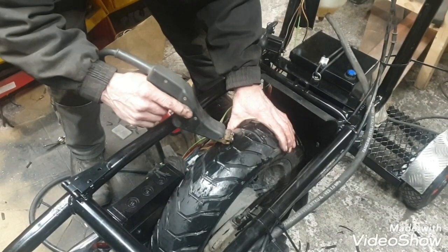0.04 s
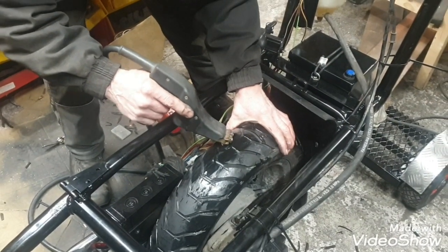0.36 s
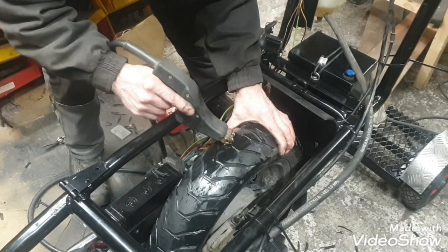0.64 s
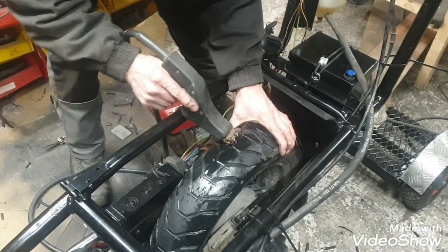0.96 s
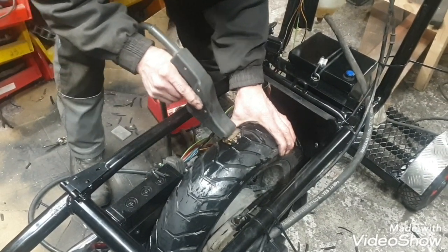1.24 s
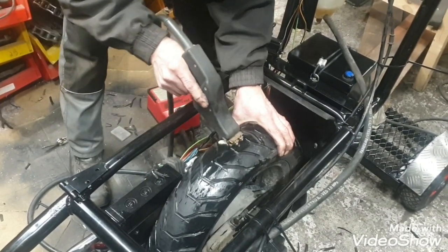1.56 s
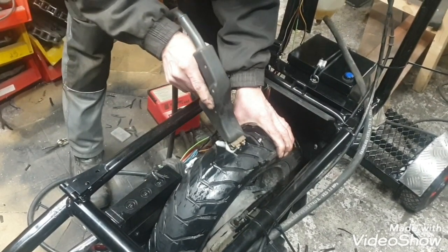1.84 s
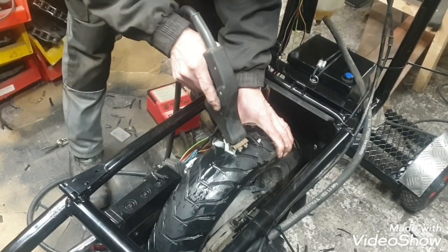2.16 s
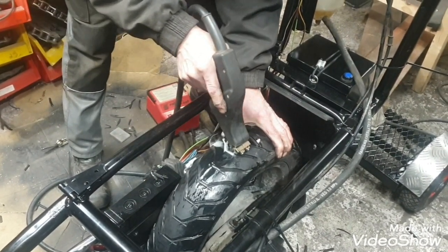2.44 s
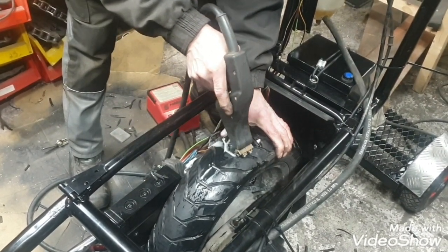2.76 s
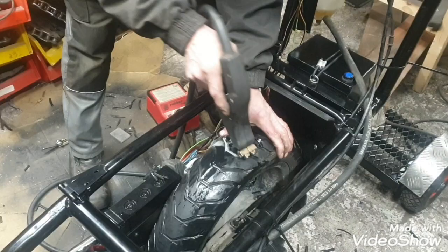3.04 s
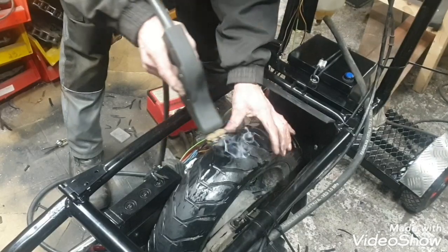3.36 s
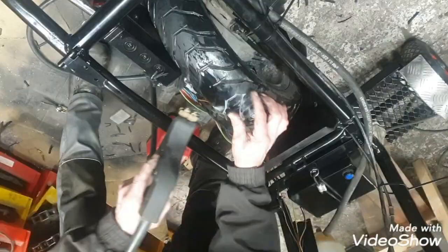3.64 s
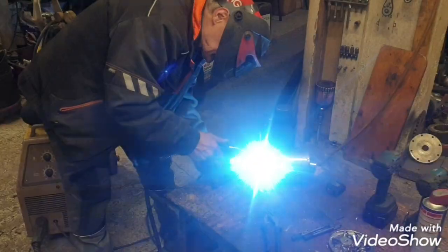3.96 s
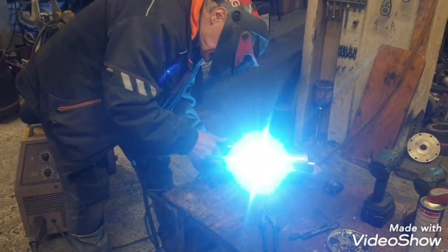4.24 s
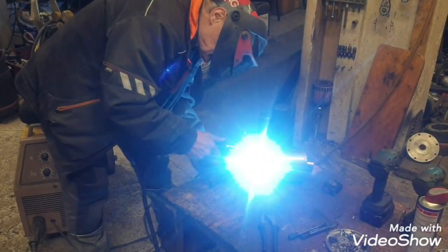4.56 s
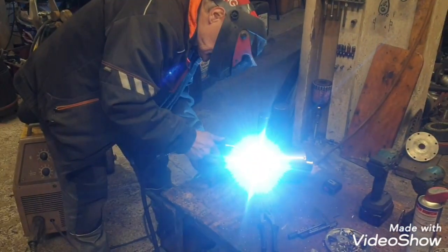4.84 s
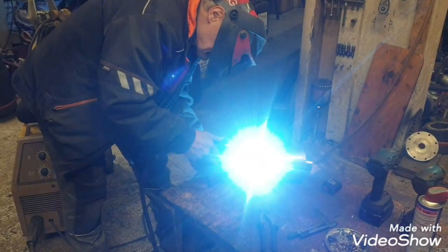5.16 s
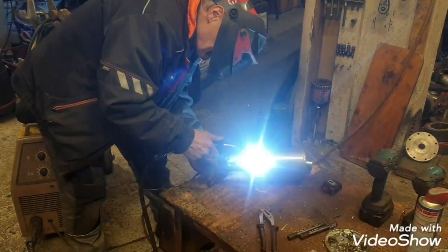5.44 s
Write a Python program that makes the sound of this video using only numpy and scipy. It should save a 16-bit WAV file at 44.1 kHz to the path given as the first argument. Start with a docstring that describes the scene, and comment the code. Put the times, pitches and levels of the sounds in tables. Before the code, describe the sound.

In a workshop, a hand tool clicks, knocks and rubs quietly on a tyre over a low rumble, ending in a sharper clack with a brief steel ring. This fades away and a much louder welding arc fades in, with sharp, irregular pops over a fine sizzle. The arc stops suddenly, leaving a short room echo and a faint low drone. A stereo microphone pair hears it all slightly to the left.

```python
"""Tyre work and arc welding in a workshop

From a stereo pair in the room: a hand tool clicks, knocks and rubs quietly on a tyre over a low rumble.
That fades away and a welding arc fades in on a steel bench, with the right microphone shaded from it.
Molten drops burst in sharp, irregular pops over a fine sizzle, thrown back by the bench and the walls,
until the arc stops and the room rings out over a low drone."""
import sys
import numpy as np
from scipy import signal
from scipy.fft import rfft, irfft, next_fast_len
from scipy.io import wavfile
from scipy.ndimage import uniform_filter1d, map_coordinates

SR = 44100
rng = np.random.default_rng(int(sys.argv[2]) if len(sys.argv) > 2 else 0)


def waveform_to_disk(signal):
    """Save audio, clipped to [-1, 1], as 16-bit WAV at the path in sys.argv[1]."""
    frames = np.transpose(np.atleast_2d(signal))
    scaled = np.clip(frames, -1, 1) * 32767
    samples = np.round(scaled).astype(np.int16)
    wavfile.write(sys.argv[1], SR, samples)


N = 246959
TIME, CONTACT_TIME = np.arange(N) / SR, np.arange(SR // 2) / SR  # s: the scene, one contact
ARC_ON_S, ARC_OFF_S = 3.58, 5.455


def amp(db):
    return 10 ** (np.asarray(db) / 20)


def unit(x):
    return x / np.sqrt(np.mean(x ** 2) + 1e-20)


def along(points, hz):
    """Read (Hz, value) points on a log frequency axis."""
    point_hz, values = np.transpose(points)
    return np.interp(np.log(hz + 1), np.log(point_hz + 1), values)


def wobble(rate):
    """A smooth random curve, rate knots a second."""
    return map_coordinates(rng.standard_normal(int(N * rate / SR) + 4), [TIME * rate])


def swell(start, length, attack_s, release_s):
    """Straight attack, hold until start + length, then an exponential release."""
    t = TIME - start
    return np.clip(t / attack_s, 0, 1) * np.exp(-np.maximum(t - length, 0) / release_s)


def filtered(x, response):
    """Shape x by a response, a function of frequency."""
    n = x.shape[-1]
    size = next_fast_len(n + SR // 4)
    return irfft(rfft(x, size) * response(np.fft.rfftfreq(size, 1 / SR)), size)[..., :n]


def ride_band(x, low_hz, high_hz, gain_db):
    """Raise or lower one band of x by a gain that moves in time."""
    band = filtered(x, lambda hz: 1 / (1 + (hz / high_hz) ** 4) - 1 / (1 + (hz / low_hz) ** 4))
    return x + band * (amp(gain_db) - 1)


def convolved(x, kernel):
    """Causal convolution, cut to the length of x."""
    return signal.fftconvolve(np.atleast_2d(x), np.atleast_2d(kernel), axes=1)[:, :x.shape[-1]]


def impulse(colour, peaks=(), size=4096):
    """The shortest causal pulse with this (Hz, dB) colour and these (Hz, width Hz, dB) peaks."""
    hz = np.fft.rfftfreq(size, 1 / SR)
    peaks_db = sum(db / (1 + ((hz - centre) / width) ** 2) for centre, width, db in peaks)
    cepstrum = irfft(np.log(amp(along(colour, hz) + peaks_db)))
    cepstrum[1:size // 2] *= 2
    cepstrum[size // 2 + 1:] = 0
    return irfft(np.exp(rfft(cepstrum)))


def diffuse(n):
    """White stereo noise, alike at both microphones only in the bass."""
    # likeness of left and right: frequency_hz, correlation
    likeness = [(40, 0.94), (130, 0.86), (300, 0.77), (700, 0.32), (2000, 0)]
    angle = lambda hz: np.arccos(np.clip(along(likeness, hz), -1, 1)) / 2
    weights = lambda hz: np.array([np.cos(angle(hz)), np.sin(angle(hz))])
    mid, side = filtered(rng.standard_normal((2, n)), weights)
    return np.array([mid + side, mid - side])


def noise(colour):
    """Coloured stereo noise of rms 1."""
    return unit(filtered(diffuse(N), lambda hz: amp(along(colour, hz))))


def burst(pulse, t60):
    """A dying puff of stereo noise with the pulse's colour."""
    puff = diffuse(len(CONTACT_TIME)) * amp(-60 * CONTACT_TIME / t60)
    return convolved(puff, pulse / np.linalg.norm(pulse))


def ringing(modes, attack_s, t=CONTACT_TIME):
    """Damped sines from (Hz, dB, t60 s) rows."""
    ring = sum(amp(db - 60 * t / t60) * np.sin(2 * np.pi * hz * t) for hz, db, t60 in modes)
    return ring * (1 - np.exp(-t / attack_s))


def room_tail(build_s):
    """The workshop's stereo reverberation builds up, then dies, fastest in the top treble."""
    # decay of the room: frequency_hz, t60_s
    decay = [(150, 0.49), (800, 0.36), (3000, 0.43), (7000, 0.33), (15000, 0.21)]
    hz, t, spectrum = signal.stft(diffuse(SR * 3 // 4), SR, nperseg=256)
    tail = signal.istft(spectrum * amp(-60 * t / along(decay, hz)[:, None]), SR, nperseg=256)[1]
    tail *= 1 - np.exp(-np.arange(tail.shape[1]) / SR / build_s)
    return tail / np.linalg.norm(tail[0])


def contact(start_s, sound, room_db):
    """One contact placed in time, with the room's answer."""
    out = np.zeros((2, N + SR))
    room = amp(room_db) * convolved(sound, room_tail(build_s=0.0013))
    out[:, round(start_s * SR):][:, :len(CONTACT_TIME)] = sound + room
    return out[:, :N]


def rumble_and_rubbing():
    """Room tone and rubbing; each stroke on the tyre lifts rumble and rub and makes the rubber groan."""
    # the hand pushes the tool: start_s, length_s, rub_db, rumble_db, groan_hz, groan_db
    strokes = [(0.33, 0.32, -83, -60, 150, -64.5), (1.407, 0.24, -75.5, -73, 425, -73),
               (2.39, 0.15, -80, -64.5, 339, -79), (2.894, 0.12, -72, -55, 302, -71)]
    # colours of the three noises: frequency_hz, level_db
    rumble_colour = [(20, -6), (34, 3.5), (50, -1.5), (100, 2.5), (125, -6), (175, -15), (230, -20.5),
                     (268, -10), (330, -33), (700, -54)]
    rub_colour = [(120, -19.5), (300, 0.5), (430, -0.5), (580, -9.5), (1200, -16.5), (1950, -17.5),
                  (2250, -9), (2500, -19), (5000, -31.5)]
    hiss_colour = [(300, 9.5), (2000, -1), (3500, -2.5), (6000, -1.5), (7500, -13), (9500, -8),
                   (11000, -1.5), (15000, 0.5)]
    rub_gain, rumble_gain, groan = amp(-84), amp(-64), np.zeros(N)  # between strokes
    for start, length, rub_db, rumble_db, groan_hz, groan_db in strokes:
        push = swell(start, length, attack_s=0.032, release_s=0.1)
        rub_gain = np.hypot(rub_gain, amp(rub_db) * push)
        rumble_gain = np.hypot(rumble_gain, amp(rumble_db) * push)
        groan += amp(groan_db) * push * np.sin(2 * np.pi * groan_hz * TIME)
    rumble = rumble_gain * amp(1.04 * wobble(rate=7.9)) * noise(rumble_colour)
    rub = rub_gain * amp(wobble(rate=25.3)) * noise(rub_colour)
    groan *= wobble(rate=130)  # widens the tone into a rough resonance
    hiss = amp(-73.5) * noise(hiss_colour)
    return (rumble + rub + groan + hiss) * amp([[0.8], [-0.8]])


def clacks():
    """Hard parts clack together; the struck part adds its own resonance."""
    # collisions: start_s, level_db, resonance_hz, height_db, t60_s
    hits = [(0.342, -62, 4530, 7, .1), (.381, -55, 3980, 12, 0.074), (.396, -59.5, 3600, 17, 0.11),
            (.811, -73.5, 5600, 20, 0.15), (2.086, -53.5, 2410, 9.5, 0.08), (2.088, -54.5, 5230, 27, 0.18),
            (2.1, -54.5, 2920, 15, 0.075), (2.735, -68.5, 5650, 16.5, 0.48), (2.913, -50.5, 6400, 20, 0.14),
            (3.017, -54.5, 2800, 8, 0.27), (3.043, -35, 2500, 5.5, 0.036), (3.05, -37.5, 5400, 7.5, 0.02),
            (3.093, -46.5, 1210, 18, 0.037)]
    # colour of a clack: frequency_hz, level_db
    colour = [(400, -6.5), (1200, -10.5), (1750, -10), (2100, -4.5), (3700, -6.5), (4600, -4), (5400, -5),
              (7000, -7), (10000, -34.5)]
    out = np.zeros((2, N))
    for start, db, hz, height_db, t60 in hits:
        pulse = impulse(colour, peaks=[(hz, 0.29 * hz, height_db)])
        out += contact(start, amp(db) * burst(pulse, t60), room_db=-3.5)
    return out


def ticks():
    """Small bright ticks, heard with plenty of room."""
    # light contacts: start_s, level_db
    hits = [(0.342, -43), (.381, -50), (0.81, -60.5), (2.734, -51.5), (2.898, -42.5), (2.915, -37.5),
            (3.031, -43.5), (3.043, -33.5)]
    # colour of a tick: frequency_hz, level_db
    colour = [(2000, -38.5), (5000, -15), (10000, -8.5), (13000, -5.5), (16000, -2.5)]
    pulse = impulse(colour)
    return sum(contact(start, amp(db) * burst(pulse, t60=0.037), room_db=-0.5) for start, db in hits)


def tool_knocks():
    """Each knock gives a dry tock and rings the hand tool."""
    # knocks: start_s, level_db
    hits = [(.381, -63.5), (.779, -70), (1.139, -69.5), (1.796, -55), (2.086, -47), (2.101, -52),
            (2.886, -47.5), (2.914, -42.5)]
    # modes of the tool: pitch_hz, level_db, t60_s
    modes = [(788.4, 3, 0.093), (859, -3.5, 0.057), (942, -5.5, 0.037), (1000, -15, 0.035),
             (1500, -20, 0.068), (2030, -22, 0.06), (2800, -24.5, 0.06)]
    # colour of the dry contact: frequency_hz, level_db
    colour = [(300, -27), (650, -17.5), (800, 4), (950, -4.5), (1300, -24), (2600, -41.5), (6000, -70.5)]
    out = np.zeros((2, N))
    for start, db in hits:
        grip = 1 + 0.013 * rng.standard_normal()  # the hand's grip detunes each knock a little
        ring = ringing(modes, attack_s=0.0049, t=grip * CONTACT_TIME)
        tock = amp(-4.5) * burst(impulse(colour), t60=0.06)
        out += contact(start, amp(db - 0.5) * (ring + tock), room_db=-5)
    return out


def tyre_thuds():
    """Dull thuds in the tyre, heard with little room."""
    # blows: start_s, level_db
    hits = [(0.382, -56), (.398, -55), (.525, -56), (.8, -68), (2.913, -54), (3.043, -44), (3.085, -52)]
    # colour of a thud: frequency_hz, level_db
    colour = [(60, -16), (170, -3), (300, 9), (430, -7), (800, -28), (2000, -55)]
    pulse = impulse(colour)
    return sum(contact(start, amp(db) * burst(pulse, t60=0.066), room_db=-9) for start, db in hits)


def blade_sizzle():
    """A thin sizzle under the tool's blade swells, glides downwards and dies away."""
    start_s, t60_s = 1.0, 0.86
    first_hz, last_hz, sink_hz_per_s = 15700, 10600, 15000
    hz = np.clip(first_hz - sink_hz_per_s * (TIME - start_s), last_hz, first_hz)
    envelope = swell(start_s, length=0.1, attack_s=0.055, release_s=t60_s / np.log(1000))
    band = unit(filtered(rng.standard_normal((2, N)), lambda f: 1 / (1 + (f / 2200) ** 4)))
    gliding_band = band * np.sin(2 * np.pi * np.cumsum(hz) / SR)
    return amp(-64.5 + 1.3 * wobble(rate=30)) * envelope * gliding_band


def steel_ring():
    """The hardest clack rings a steel part."""
    # modes of the part: pitch_hz, level_db, t60_s
    modes = [(2030, -4, 0.15), (2105, -4.5, 0.13), (2580, 1.5, 0.1), (2590, -4, 0.15), (2640, -6.5, .22),
             (4050, -13, 0.3), (4530, -8, .25), (5500, -10, .18), (6500, -7.5, 0.2)]
    return contact(start_s=3.043, sound=amp(-45) * ringing(modes, attack_s=0.00046), room_db=-15.5)


def pops(rate, scatter_db, unevenness):
    """Impulses with uneven gaps and sizes, of rms 1 from the striking of the arc onwards."""
    gap_draw, size_draw = rng.standard_normal((8000, 2)).T
    gaps = np.exp(unevenness * gap_draw)
    at = ((ARC_ON_S + np.cumsum(gaps / gaps.mean()) / rate) * SR).astype(int)
    sizes = amp(scatter_db * np.minimum(size_draw, 1.8))
    train = np.bincount(at[at < N], sizes[at < N], N)
    return train / np.sqrt(np.mean(train[int(ARC_ON_S * SR):] ** 2))


def arc():
    """Molten drops short the arc, which hushes, and burst; small pops and discharges sizzle between."""
    # the burn, almost even but for one thinner stretch: time_s, crackle_db, sputter_lift_db
    burn = [(3.65, -28.5, 1.5), (3.9, -33, -2), (4.07, -29.5, 1), (4.22, -32, 4), (4.42, -31.5, 1.5),
            (4.62, -30, 1.5), (4.69, -29.5, -8.5), (4.8, -32, -1.5), (4.83, -32.5, -4), (4.865, -34, -5),
            (4.89, -31, 2), (5.01, -32, -0.5), (5.06, -30, 2), (5.16, -31, 2.5), (5.3, -31, 4),
            (5.44, -29, 2)]
    # loudest spatter pops: start_s, level_db
    spatter_pops = [(3.68, -3), (3.6974, -2), (3.7147, -1), (3.7261, -6), (3.7452, -5), (3.7572, -7),
                    (3.7691, -4), (3.7827, -3), (3.8029, -4), (3.8284, -6), (3.8825, -7), (3.9122, -4),
                    (3.9507, -6), (3.9869, -5), (4.0005, -5), (4.0371, -6), (4.0548, -6), (4.066, -5),
                    (4.0828, -5), (4.0951, -4), (4.1107, -7), (4.1263, -5), (4.1432, -7), (4.1748, -7),
                    (4.191, -5), (4.2092, -3), (4.2255, -5), (4.2729, -1), (4.2936, -2), (4.3112, -6),
                    (4.3259, -5), (4.3388, -5), (4.3529, -4), (4.3686, -7), (4.3875, -5), (4.4018, -6),
                    (4.4186, -7), (4.4415, -6), (4.4641, -5), (4.4854, -5), (4.5193, -6), (4.5588, -5),
                    (4.5756, -7), (4.6192, -6), (4.6371, -3), (4.6588, -3), (4.6766, -5), (4.693, -2),
                    (4.7044, -6), (4.7452, -6), (4.7702, -2), (4.79, -5), (4.9736, -6), (4.9895, -6),
                    (5.041, -6), (5.0626, -7), (5.1336, -6), (5.1607, -5), (5.2017, -6), (5.2143, -4),
                    (5.2664, -7), (5.3274, 0), (5.333, -4), (5.3437, -6), (5.4112, -5), (5.4238, -7),
                    (5.4387, -2), (5.4442, -5)]
    # the wire sticks in the pool and the arc is quiet: start_s, length_s
    stalls = [(3.842, 0.024), (4.758, 0.0039), (4.848, 0.0074)]
    # colour of one pop: frequency_hz, level_db
    pop_colour = [(20, -40), (45, -9), (85, -18.5), (122, -7.5), (172, -5), (240, -11.5), (400, -11),
                  (500, -15), (640, -8.5), (850, -8), (1150, -10.5), (1580, -4), (2100, -10), (4000, -0.5),
                  (7000, -2.5), (11000, 0), (14500, 1.5)]
    # narrow peaks and hollows that give the pops a metallic colour: centre_hz, width_hz, gain_db
    metallic_colour = [(334, 45, 6), (484, 21, -1), (660, 45, 3), (809, 24, 6), (894, 26, -6.5),
                       (978, 16, 4.5), (1067, 14, -0.5), (1181, 23, 10), (1314, 39, -5), (1440, 19, 1),
                       (1903, 71, -14), (2050, 16, -2), (3576, 7.7, 5), (3925, 8.5, 2.5), (4530, 52, 5),
                       (4982, 12, 5), (5120, 10, 4), (10500, 16, 6), (10800, 19, 7), (11695, 20, 6.5),
                       (12070, 16, 1), (12400, 14, 2.5), (14200, 900, 2), (15387, 14, 9), (15648, 18, 6)]
    burn_s, crackle_db, lift_db = np.transpose(burn)
    spatter_s, spatter_db = np.transpose(spatter_pops)
    spatter = np.bincount(np.round(spatter_s * SR).astype(int), amp(spatter_db - 0.3), N)
    hush_s = 0.003  # before each spatter pop
    burning = (TIME > ARC_ON_S) & (TIME < ARC_OFF_S)
    for start, length in stalls + [(pop_s - hush_s, hush_s) for pop_s in spatter_s]:
        burning[round(start * SR):round((start + length) * SR)] = False
    crackle = amp(-2) * pops(rate=260, scatter_db=2.5, unevenness=0.7)
    fizz = pops(rate=2200, scatter_db=6, unevenness=0.9) * amp(3 * wobble(rate=130))  # in clumps
    surge = amp(np.interp(TIME, burn_s, crackle_db) + wobble(rate=35))
    bursts = (crackle + amp(-5) * fizz) * surge * burning + spatter
    bursts += amp(-53.5) * fizz * (TIME >= ARC_OFF_S)  # the hot bead still fizzes faintly
    # bigger drops push more air: the middle range swells and sinks on its own
    sputter_db = np.interp(TIME, burn_s, lift_db) + 1.2 * wobble(rate=30)
    bursts = ride_band(bursts, low_hz=257, high_hz=2100, gain_db=sputter_db)
    return -convolved(bursts + pool_plops(), impulse(pop_colour, metallic_colour))


def arc_paths(smear_s):
    """Direct sound and echoes off bench and near walls; torch and workpiece smear each arrival."""
    # paths from the arc to the microphones: delay_s, left_db, right_db
    paths = [(0, 0, -13), (.0013, -19, -3), (.00205, -22, -9.5), (.00556, -15.5, -5.5), (.00605, -15, -9.5),
             (0.0111, -15.5, -4.5), (0.0155, -22.5, -2.5)]
    response, t = np.zeros((2, SR // 10)), np.arange(SR // 400) / SR
    for delay, left_db, right_db in paths:
        arrival = rng.standard_normal((2, len(t))) * np.exp(-t / smear_s) * (t > 0)
        arrival *= amp(-5.5) / np.linalg.norm(arrival[0])
        arrival[:, 0] = amp([0.4, -5])  # the sharp front is blunted on the shaded side
        response[:, round(delay * SR):][:, :len(t)] += amp([[left_db], [right_db]]) * arrival
    return response


def bench_and_room(source, spots=2):
    """Near echoes stay put; the arc wanders over the pool, so each pop stirs the room differently."""
    # shading of the right microphone against the left: frequency_hz, gain_db
    shade = [(200, 0), (400, 0), (700, -3.5), (1300, -3.5), (2400, 1.5), (3500, -0.5), (4600, -7),
             (11000, -3.5), (15000, -3.5)]
    spot = np.repeat(rng.integers(spots, size=N // 256 + 1), 256)[:N]
    shares = [uniform_filter1d((spot == k).astype(float), size=32) for k in range(spots)]
    room = sum(convolved(source * share, room_tail(build_s=0.0076)) for share in shares)
    left, right = convolved(source, arc_paths(smear_s=0.00036)) + amp(1) * room
    return np.array([left, convolved(right, impulse(shade))[0]])


def room_boom(source):
    """The pops stir low standing waves, the same at both microphones."""
    # modes of the room: pitch_hz, gain_db, t60_s
    modes = [(75, -3, 0.1), (118.8, -6, 0.2), (169.3, -3, 0.5), (262, 7, 0.25), (385.8, 6, 0.25)]
    resonance = lambda f, hz, t60: 1j * f / (1j * f + (hz ** 2 - f ** 2) * np.pi * t60 / np.log(1000))
    response = lambda f: sum(amp(db) * resonance(f, hz, t60) for hz, db, t60 in modes)
    return filtered(np.pad(source, (0, SR)), response)[:N]


def room_drone():
    """Low room resonances drone under the arc and after it, fluttering in level, wandering in pitch."""
    # room resonances: pitch_hz, level_db
    resonances = [(120, -58.5), (168, -56)]
    wander_hz, flutter_per_s = 9, 26
    out = np.zeros(N)
    for hz, db in resonances:
        phase = 2 * np.pi * np.cumsum(hz + wander_hz * wobble(rate=9)) / SR
        tone = wobble(flutter_per_s) * np.sin(phase) + wobble(flutter_per_s) * np.cos(phase)
        out += amp(db) * unit(tone)
    return out


def pool_plops(t60_s=0.067):
    """The molten pool plops and thumps: short, dull puffs of air, two octaves wide."""
    # puffs: start_s, level_db, top_hz
    plops = [(3.881, 7, 1500), (4.295, 11, 170), (4.47, 9, 110), (4.7, 13, 110), (5.039, 6, 503),
             (5.132, 8, 1000), (5.175, 4, 700), (5.24, 10, 250), (5.41, 10, 130), (5.536, 0.5, 1080)]
    out, t = np.zeros(N + SR), np.arange(SR // 10) / SR
    for start, db, top_hz in plops:
        puff = rng.standard_normal(len(t)) * amp(-60 * t / t60_s)
        band = signal.butter(2, [top_hz / 4, top_hz], "bandpass", fs=SR, output="sos")
        out[round(start * SR):][:len(t)] += amp(db) * signal.sosfilt(band, puff / np.linalg.norm(puff))
    return out[:N]


def falter(x, at_s=4.854, half_width_s=0.01, depth_db=-12):
    """The middle range drops out briefly."""
    dip = np.exp(-((TIME - at_s) / half_width_s) ** 2)
    return ride_band(x, low_hz=350, high_hz=2600, gain_db=depth_db * dip)


def scene():
    """The tyre work, a little to the left, fades to silence; the welding rises from it."""
    change_s, fade_out_s, fade_in_s = 3.582, 0.97, 1.0
    crackle = arc()
    welding = falter(bench_and_room(crackle)) + room_boom(crackle[0]) + room_drone()
    contacts = clacks() + ticks() + tyre_thuds() + tool_knocks() + steel_ring()
    tyre_work = contacts * amp([[1.5], [-1.5]]) + blade_sizzle() + rumble_and_rubbing()
    fade_out = np.clip((change_s - TIME) / fade_out_s, 0, 1)
    fade_in = np.clip((TIME - change_s) / fade_in_s, 0, 1)
    return tyre_work * fade_out + welding * fade_in


def record(dry):
    """Both microphones have a deep dip near 9 kHz; nothing is kept above 16 kHz."""
    # response of each microphone: frequency_hz, gain_db
    left_mic = [(6400, 1), (7400, -2.5), (8300, -8.5), (8900, -18), (9500, -7.5), (10300, 0)]
    right_mic = [(6400, 0.5), (7400, -9.5), (8900, -16.5), (9500, -8.5), (10300, -2.5)]
    band_limit = lambda hz: np.sin(np.pi / 2 * np.clip((16000 - hz) / 300, 0, 1)) ** 2
    return filtered(dry, lambda hz: amp([along(left_mic, hz), along(right_mic, hz)]) * band_limit(hz))


dry = scene()
out = record(dry)
waveform_to_disk(out)
```